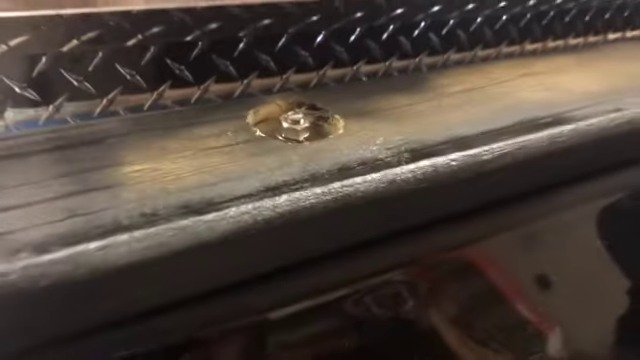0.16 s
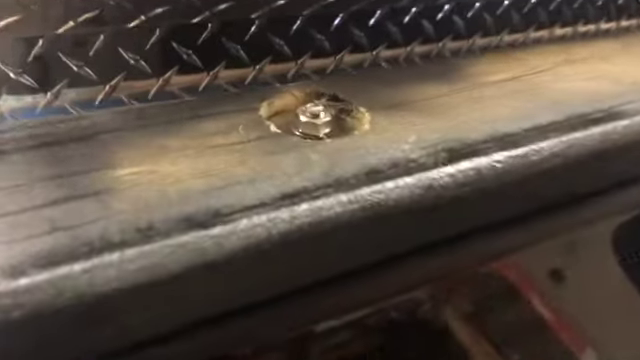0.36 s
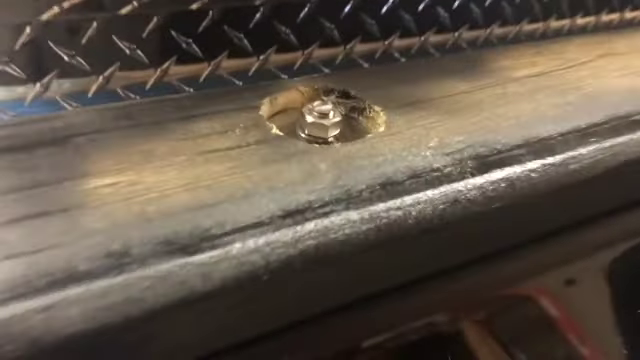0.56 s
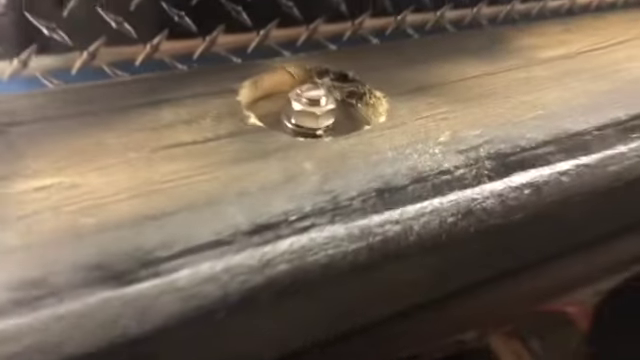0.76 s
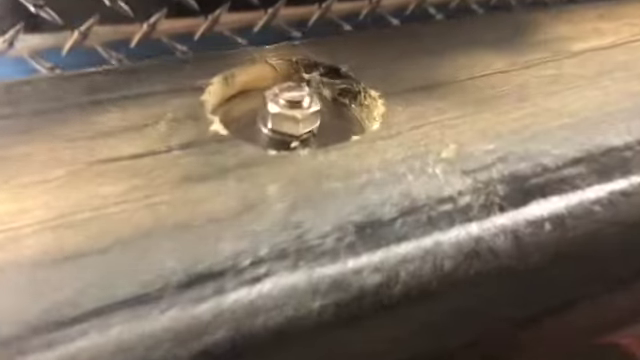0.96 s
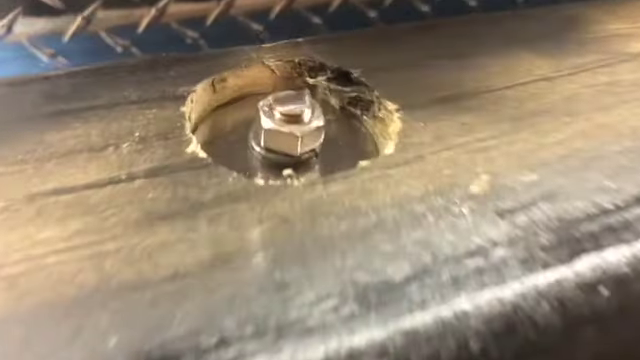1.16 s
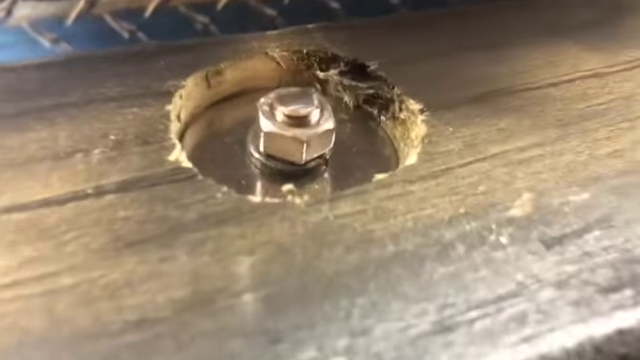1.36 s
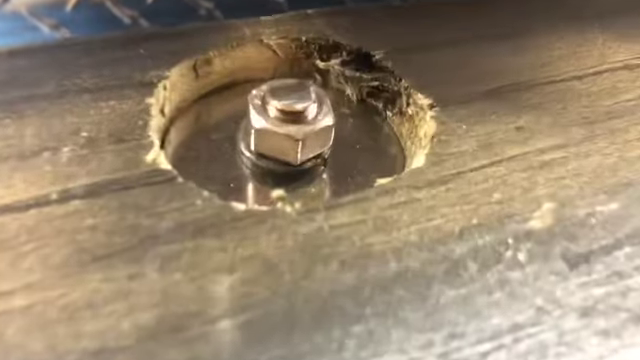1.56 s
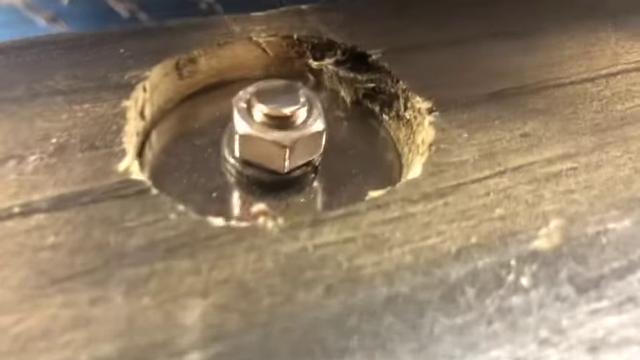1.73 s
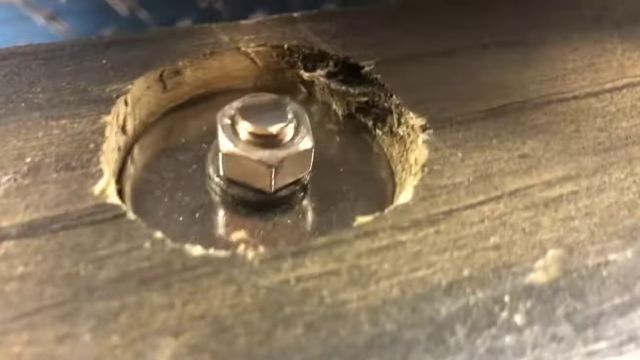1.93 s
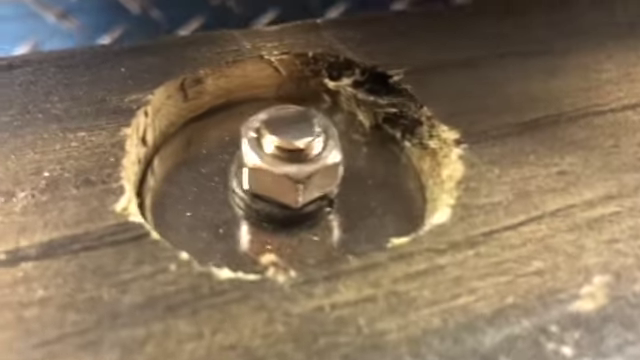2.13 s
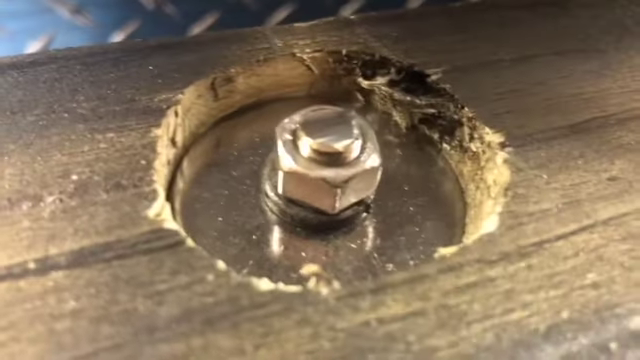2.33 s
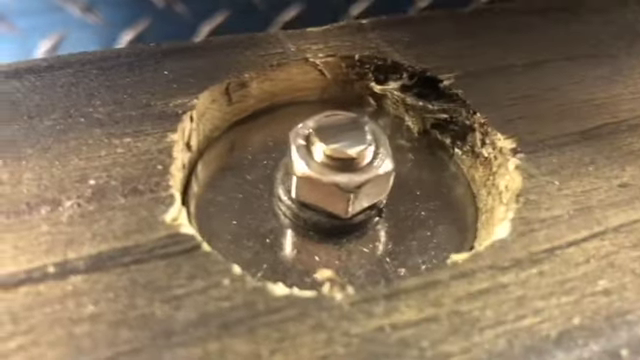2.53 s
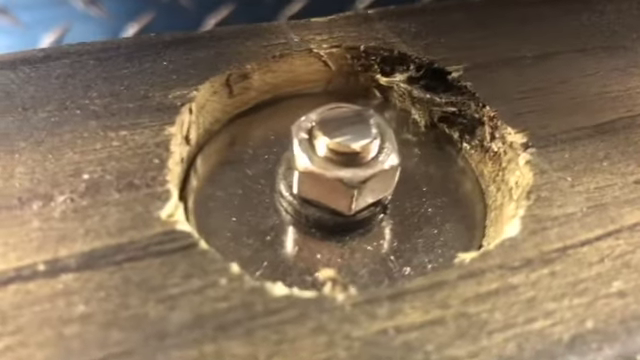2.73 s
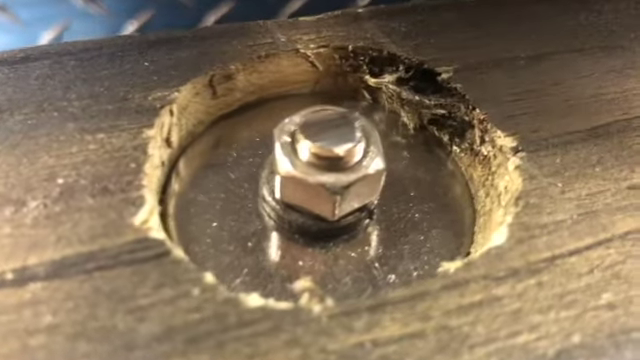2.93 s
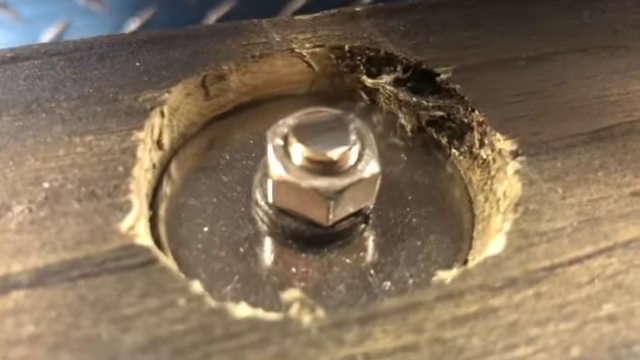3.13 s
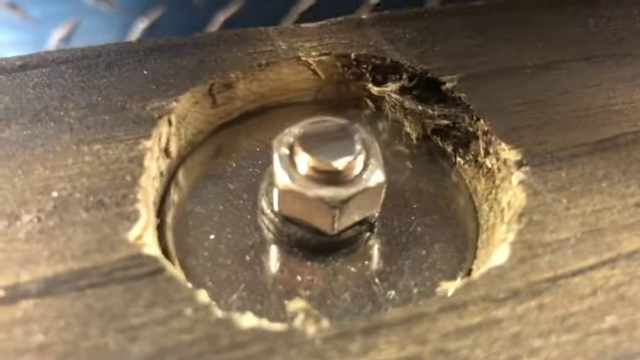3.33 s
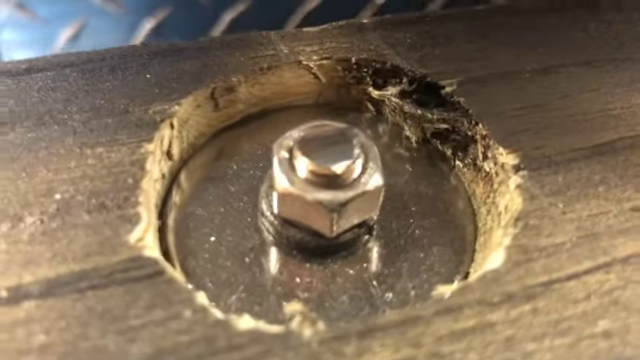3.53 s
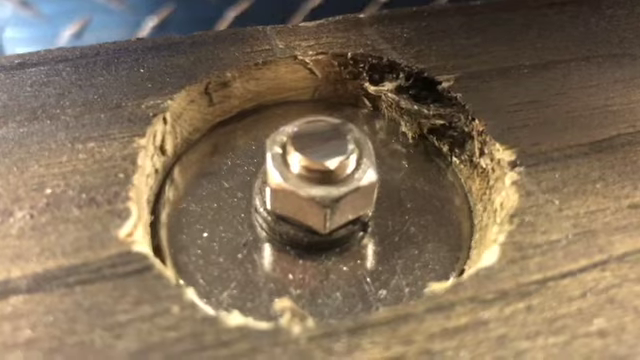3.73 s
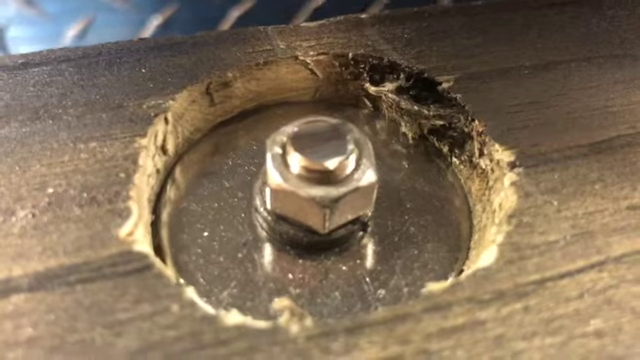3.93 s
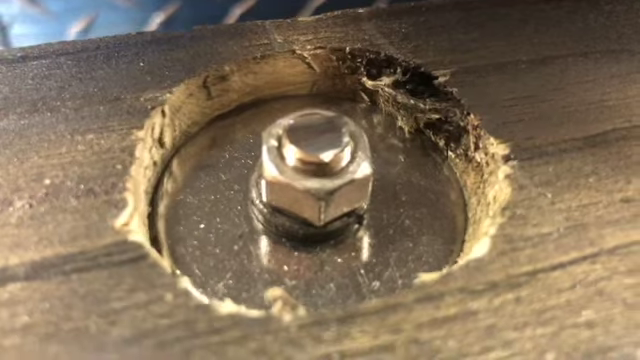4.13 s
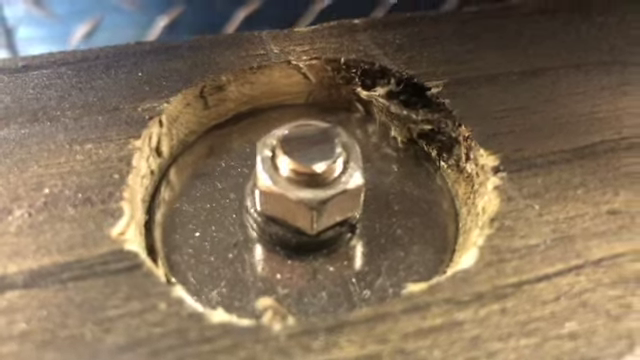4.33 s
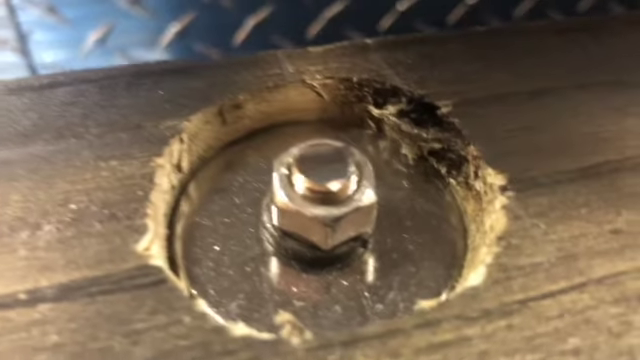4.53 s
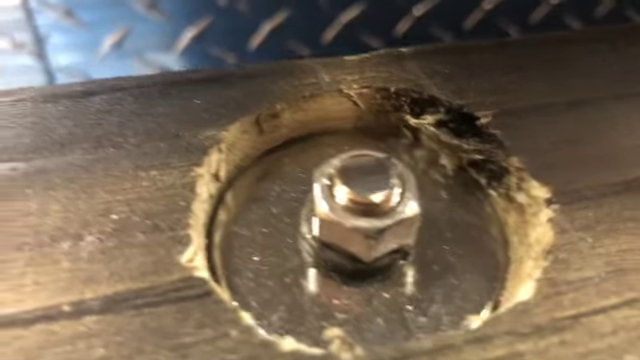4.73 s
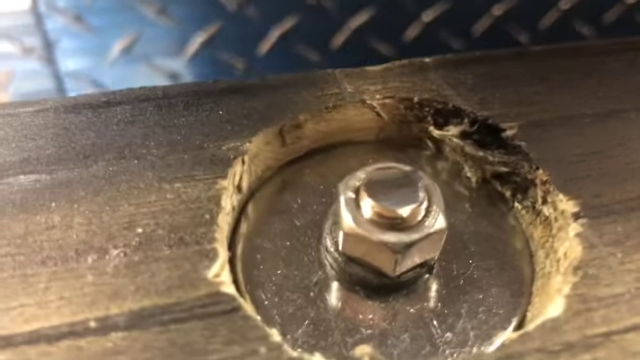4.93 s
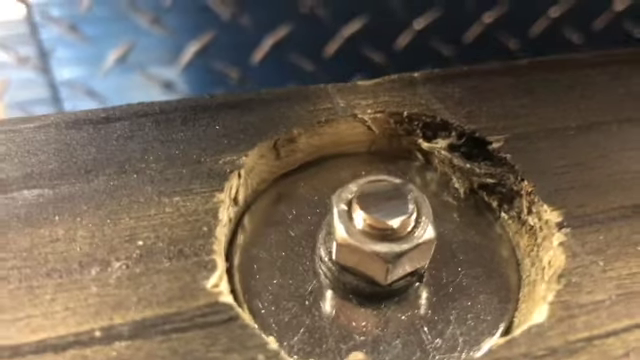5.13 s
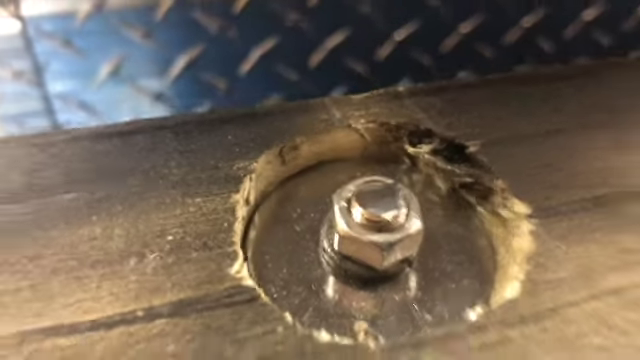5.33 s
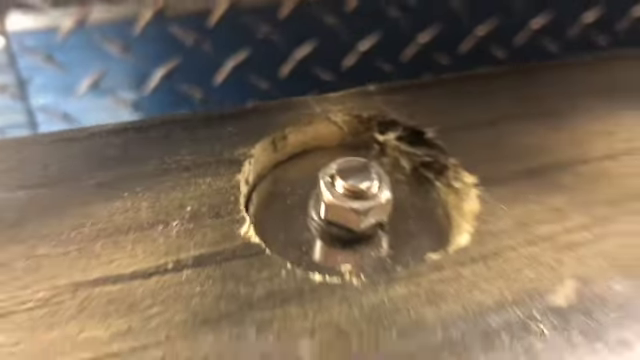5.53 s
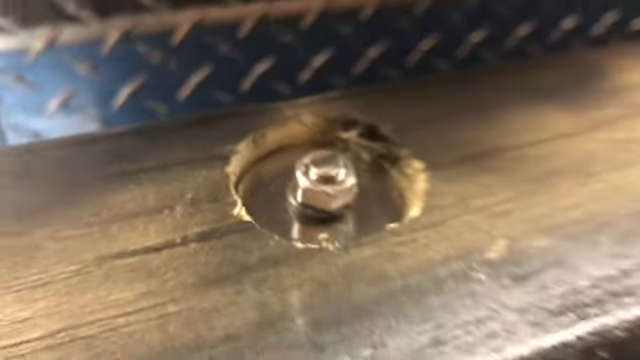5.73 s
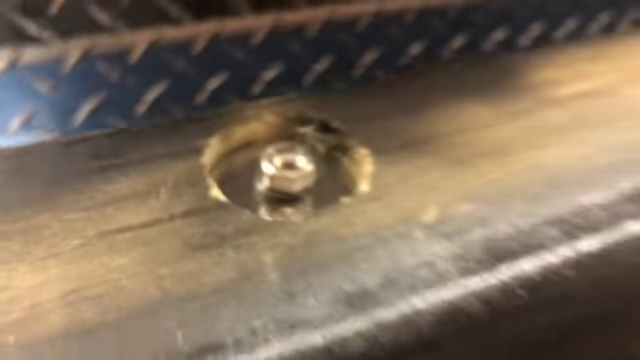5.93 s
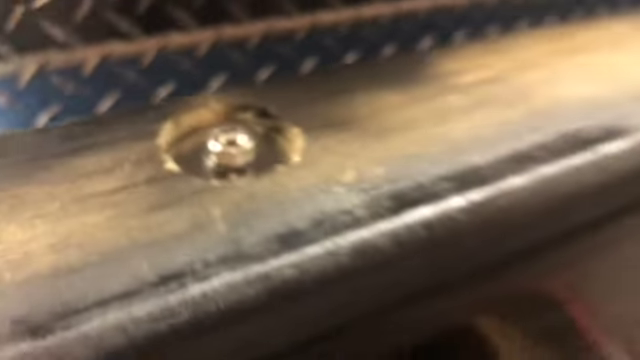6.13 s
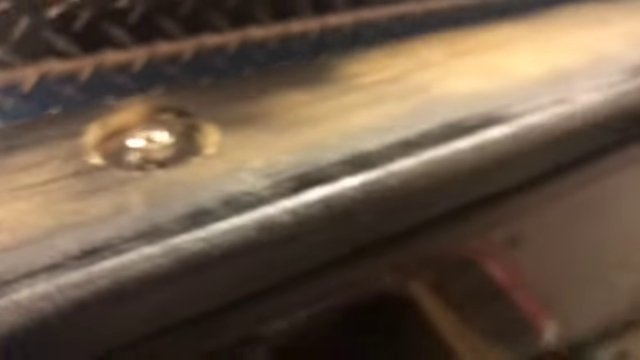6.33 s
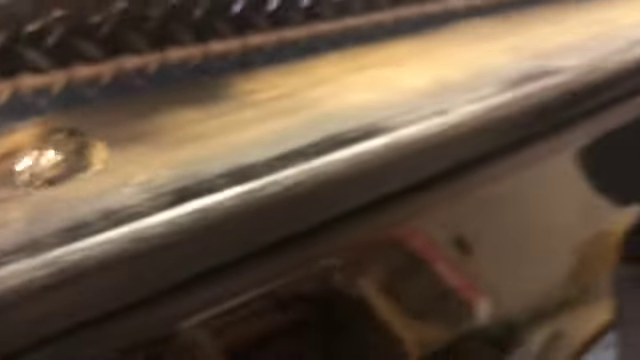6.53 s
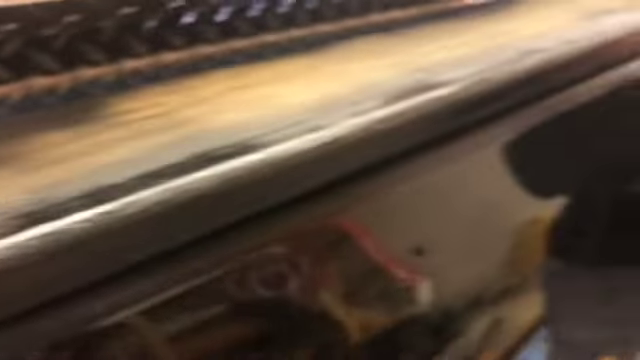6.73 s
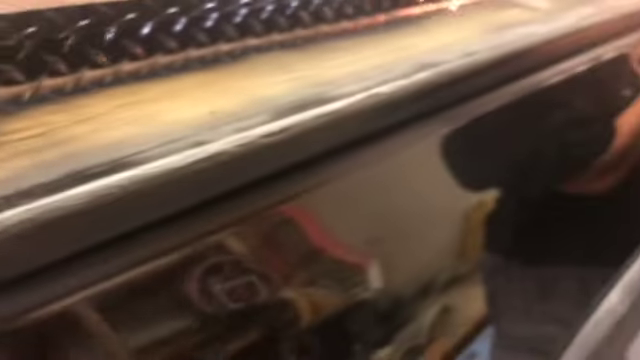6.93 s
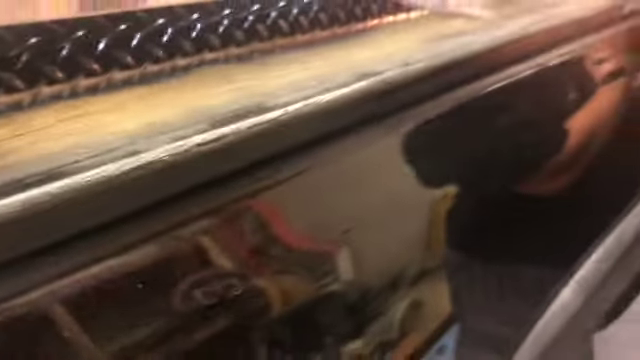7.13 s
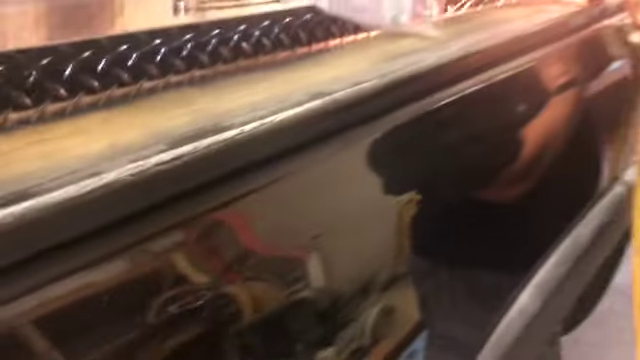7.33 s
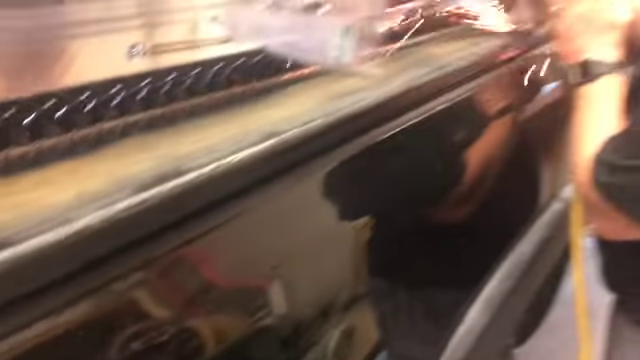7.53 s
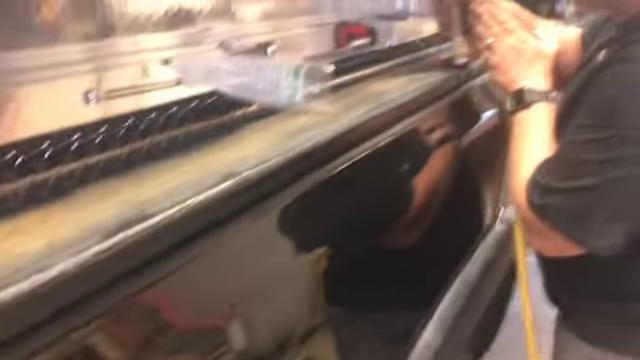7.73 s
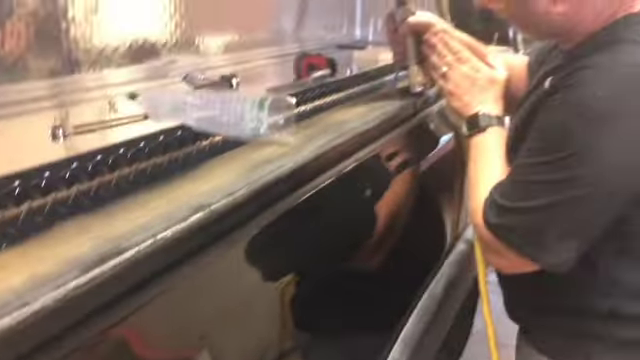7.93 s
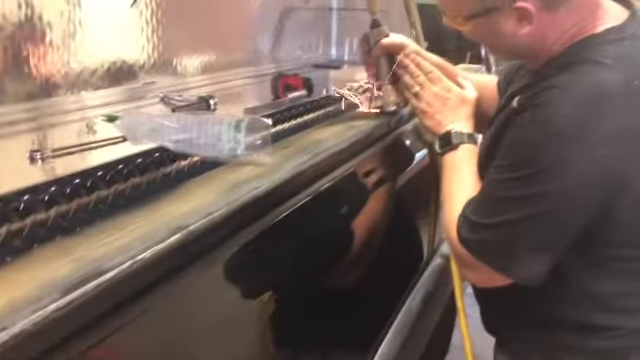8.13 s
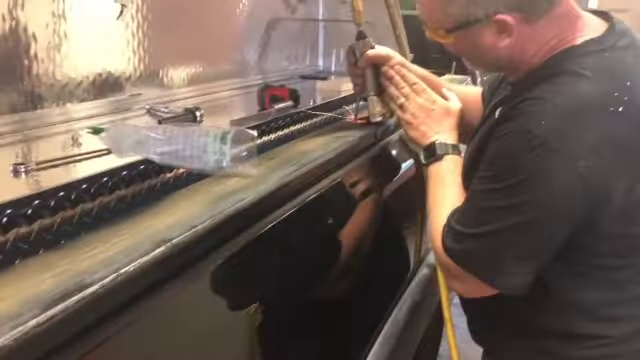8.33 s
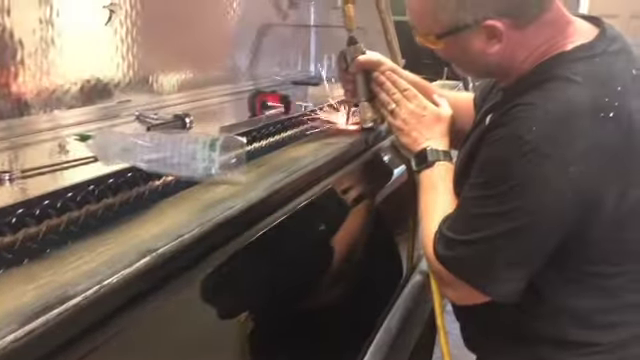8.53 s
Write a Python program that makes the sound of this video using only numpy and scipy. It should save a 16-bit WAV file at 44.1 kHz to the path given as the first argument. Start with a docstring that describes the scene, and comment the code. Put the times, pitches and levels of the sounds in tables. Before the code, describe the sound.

Quiet workshop with faint air hiss, knocks and metal clinks, then an air cut-off tool bursts into a high whine and grinds into a bolt.

```python
"""A quiet workshop with room tone, a faint air leak, rustling clothes, ticks, knocks and dull thuds, all shaped noise.
Then a valve lets in a rush of air and a four-vane air cut-off tool spins up with the lag of its rotor.
It runs free on vane tones, shaft orders (multiples of the turning rate) and exhaust hiss.
Last, its abrasive wheel bites into a bolt: the whine sags and climbs with the load, amid chatter and grit."""
import sys
import numpy as np
from scipy import signal
from scipy.fft import rfft, irfft
from scipy.io import wavfile
from scipy.ndimage import uniform_filter1d

SR = 44100
rng = np.random.default_rng(int(sys.argv[2]) if len(sys.argv) > 2 else 0)


def materialize(psi):
    """Save the field psi as 16-bit PCM at rate SR to the path in sys.argv[1].

    A 1-D psi becomes a single channel; in a 2-D psi each row is a channel.
    """
    bounded = np.clip(np.atleast_2d(psi).T, -1, 1)
    quanta = np.round(bounded * 32767).astype(np.int16)
    wavfile.write(sys.argv[1], SR, quanta)


N = 377937  # length in samples

VANES = 4
EDGE_HZ = 15750  # upper band limit
RUN_UP_DB_PER_MULTIPLE = -2  # slope of the row of vane multiples that barks while the rotor accelerates
# How the exhaust port and the shop colour the vane tone and its multiples.
# Each row: frequency in Hz, level in dB.
PORT = [(300, -35), (600, -25), (900, -23.5), (1150, -17.5), (1650, -18), (2000, -41), (2450, -18),
        (2900, -23), (3200, -28.5), (3500, -17), (3800, -35.5), (4000, -28), (4400, -41.5), (5050, -25.5),
        (6200, -33), (9000, -50)]


def gain_of(db):
    """Decibels to gain."""
    return 10 ** (np.asarray(db) / 20)


def evened(x):
    """Scales to rms 1."""
    return x / np.sqrt(np.mean(x ** 2) + 1e-20)


def read(points, hz):
    """Reads a spectrum table on a log-frequency axis."""
    f, value = np.transpose(points)
    return np.interp(np.log(hz + 1), np.log(f + 1), value)


def add(mix, s, sound):
    """Mixes a sound in at s seconds."""
    part = mix[round(s * SR):][:len(sound)]
    part += sound[:len(part)]


def bands(modes, hz):
    """Gain of a set of resonances, each given by centre Hz, width Hz and level dB, summed in power."""
    return np.sqrt(sum(gain_of(2 * db) / (1 + (2 * (hz - f) / width) ** 2) for f, width, db in modes))


def shaped(gain, size):
    """Steady noise of rms 1 whose spectrum is gain(hz)."""
    spectrum = rfft(rng.standard_normal(size))
    hz = np.fft.rfftfreq(size, 1 / SR)
    return evened(irfft(spectrum * gain(hz), size))


def coloured(points, size):
    """Steady noise of rms 1 with a tabled spectrum."""
    return shaped(lambda hz: gain_of(read(points, hz)), size)


def wander(size, rate):
    """Slow chance of rms 1, changing about rate times a second."""
    steps_per_s = 400
    steps = rng.standard_normal(int(size / SR * steps_per_s) + 2)
    width = max(int(steps_per_s / rate), 1)
    slow = evened(uniform_filter1d(uniform_filter1d(steps, width), width))
    return np.interp(np.arange(size) / SR * steps_per_s, np.arange(len(slow)), slow)


def patchy(x, depth_db, count=24):
    """Lets bands a few hundred hertz wide swell and fade on their own, each for about count frames."""
    z = signal.stft(x, nperseg=512)[2]
    patches = uniform_filter1d(rng.standard_normal(z.shape), size=4, axis=0)
    patches = uniform_filter1d(patches, size=count, axis=1)
    flickering = z * gain_of(depth_db * evened(patches))
    return evened(signal.istft(flickering, nperseg=512)[1][:len(x)])


def dying(noise, db, rise, t60):
    """Lets noise rise for rise seconds, then die away by 60 dB in t60 seconds."""
    t = np.arange(len(noise)) / SR
    decay = gain_of(db - 60 * np.maximum(t - rise, 0) / t60)
    return decay * np.minimum(t / rise, 1) * noise


def shop():
    """Room tone, the hiss of a leaking air line in whistling bands, and the rustle of clothes."""
    # Spectrum of the room tone. Each row: frequency in Hz, relative level in dB per Hz.
    room_colour = [(15, -58), (25, -18), (107, 5), (391, -10), (767, -26), (854, -12.5), (1350, -36),
                   (1590, -31.5), (15700, -20.5)]
    # Whistling bands of the leak. Each row: centre in Hz, width in Hz, relative level in dB.
    leak_bands = [(5570, 380, 6.5), (7900, 500, 6), (10300, 260, 1), (12350, 250, -15), (13800, 540, 3),
                  (10800, 8500, 6)]
    # Slow course of leak and clothes. Each row: time in seconds, leak hiss in dB, rustle in dB.
    air = [(0, -76, -66.5), (.37, -64, -66), (.6, -70, -63.5), (1.0, -68, -62), (1.4, -76, -61.5),
           (1.7, -86, -62.5), (2.1, -66, -69.5), (2.6, -65.5, -70.5), (4.2, -64.5, -73), (5.1, -65, -72.5)]
    rustle_colour = [(200, -6.0), (1200, -3.0), (4000, -9), (12000, -14.5)]  # Hz, relative dB per Hz
    room_db = -66
    s, leak_db, rustle_db = np.transpose(air)
    t = np.arange(N) / SR
    leak = patchy(shaped(lambda hz: bands(leak_bands, hz), N), depth_db=3.5, count=90)
    leak = leak * gain_of(np.interp(t, s, leak_db))
    rustle = coloured(rustle_colour, N) * gain_of(np.interp(t, s, rustle_db))
    rustle = rustle * gain_of(1.5 * wander(N, 25))
    return gain_of(room_db) * coloured(room_colour, N) + leak + rustle


def thud(db, ring, bright_db, boom_db):
    """A far burst of noise whose bands die away at the hall's own speeds, over the boom of the floor."""
    # Spectrum of the burst. Each row: frequency in Hz, relative level in dB per Hz.
    burst_colour = [(47, -47), (80, -23), (255, 11.5), (574, -17), (715, -7), (1680, -22.5), (2330, -40),
                    (15000, -66.5)]
    # Decay of the hall, before the ring factor. Each row: frequency in Hz, t60 in seconds.
    hall = [(100, 0.21), (260, 0.52), (700, 0.33), (1840, 0.15), (4850, 0.12)]
    boom_hz, boom_width_hz, boom_t60 = 128, 65, 0.74
    hz, t, z = signal.stft(rng.standard_normal(SR), SR, nperseg=256)
    shape_db = read(burst_colour, hz) + bright_db * np.log2((np.minimum(hz, 5000) + 40) / 500)
    t60 = ring * read(hall, hz)[:, None]
    z = z * gain_of(shape_db[:, None] - 60 * t / t60)
    burst = signal.istft(z, SR, nperseg=256)[1][:SR]
    attack = np.minimum(np.arange(SR) / (.0025 * SR), 1)
    burst = burst * attack / np.sqrt(np.mean(burst[:1000] ** 2))  # level set by the first moment
    boom = shaped(lambda f: bands([(boom_hz, boom_width_hz, 0)], f) ** 2, SR)
    return gain_of(db) * burst + dying(boom, boom_db, 0.024, boom_t60)


def knock(db, bright_db, t60):
    """A short dense clunk with the colour of the plank and a hard front."""
    # Spectrum of the plank. Each row: frequency in Hz, relative level in dB per Hz.
    wood = [(35, -48), (60, 8.5), (324, 14.5), (835, 3), (1010, 1.5), (1710, -22), (2420, -25.5),
            (3500, -36.5), (15000, -56)]
    crack, crack_s = 1.2, .006  # the first moment stands out: extra gain, fade in seconds
    size = SR // 4
    plank = shaped(lambda hz: gain_of(read(wood, hz) + bright_db * np.log2((hz + 40) / 500)), size)
    front = 1 + crack * np.exp(-np.arange(size) / (crack_s * SR))
    return dying(plank, db, .0015, t60) * front


def tick(db, hz, width_hz, rise, t60):
    """A dying puff of noise around one pitch."""
    return dying(shaped(lambda f: bands([(hz, width_hz, 0)], f) ** 2, SR // 3), db, rise, t60)


def clink(db, t60):
    """A metal fitting rattles: a broad tick, then noise through the resonances of the fitting."""
    # Resonances of the metal. Each row: centre in Hz, width in Hz, relative level in dB.
    fitting = [(880, 69, 2.5), (2050, 110, -1.5), (4600, 430, -3.5), (5340, 380, -2), (6350, 350, 2),
               (8000, 210, 2.5), (10300, 320, -7), (13200, 600, -11)]
    ring = dying(shaped(lambda hz: bands(fitting, hz), SR // 3), db, 0.0028, t60)
    return ring + tick(db - 2.0, 8200, 12000, 0.0009, 0.033)


def valve():
    """The throttle opens with a rough rush of air."""
    # Spectrum of the first rush. Each row: frequency in Hz, relative level in dB per Hz.
    rush = [(60, -27), (150, -3), (300, 2.5), (900, -3.5), (1250, -4), (1600, 0.5), (2000, -11.5),
            (8000, -18)]
    return dying(coloured(rush, SR // 2), db=-15, rise=0.02, t60=0.2)


def rotor(t):
    """Shaft speed in turns a second: the rotor chases the allowed speed with a lag."""
    # The speed that air supply and load allow. Each row: time in seconds, shaft turns a second.
    aim = [(5.17, 120.8), (5.228, 295.3), (5.411, 317.4), (6.472, 317.4), (6.511, 311.2), (6.616, 313.9),
           (6.826, 339.8), (7.128, 333.0), (7.356, 310.3), (7.455, 317.5), (7.637, 379.7), (7.709, 375.5),
           (7.777, 383.1), (7.984, 383.0), (8.157, 365.3), (8.174, 371.1), (8.433, 379.7), (8.44, 334.4)]
    lag_s, kick = .063, 45  # time constant; first speed in turns a second
    keep = np.exp(-1 / (lag_s * SR))
    allowed = np.interp(t, *np.transpose(aim))
    return kick + signal.lfilter([1 - keep], [1, -keep], allowed - kick)


def exhaust(turns, bite):
    """Hiss of the vented air, puffed by each vane; it gives way to the grinding."""
    # Spectrum of the air hiss. Each row: frequency in Hz, relative level in dB per Hz.
    air_colour = [(60, -27), (200, -19.5), (450, -22.5), (1100, -9), (1550, -3), (2100, -15.5), (2600, 0),
                  (4000, -6.5), (6700, -1), (10000, -5.5), (12500, -7), (15700, -6)]
    puffs = 1 + 0.079 * np.cos(2 * np.pi * VANES * turns)
    return patchy(coloured(air_colour, len(turns)), depth_db=2.5) * puffs * np.sqrt(1 - bite)


def grinding(turns, bite):
    """Grit on steel: noise that swells as the wheel's high spot meets the bolt once a turn."""
    # Spectrum of the grit with the ring of the wheel. Each row: frequency in Hz, relative level in dB per Hz.
    grit_colour = [(60, -24), (400, -24), (1200, -22), (2200, -7.5), (3500, -18), (5000, 5.5), (7000, -3),
                   (8500, 5.5), (9100, 7.5), (9800, 1), (12000, -0.5), (15700, -1)]
    scrape = 1 + 0.11 * np.cos(2 * np.pi * turns)
    grit = patchy(coloured(grit_colour, len(turns)), depth_db=2.2)
    return grit * scrape * np.sqrt(bite) * gain_of(1.8 * wander(len(turns), 30))


def vane_levels(t, speed, run_up, bite, vane_db, second_db):
    """Levels in dB of the first four vane multiples, coloured by the port they sweep through."""
    # Brief changes, mostly dips, of the 2nd multiple. Each row: time in seconds, change in dB, length in seconds.
    dropouts = [(5.595, -9.5, 0.059), (6.788, -16, 0.057), (7.181, -15, 0.046), (7.24, -16, 0.022),
                (7.399, 1, 0.044), (7.665, -8, 0.023), (8.162, -16, 0.022), (8.28, -18, 0.03),
                (8.452, -13, 0.026)]
    second_db = second_db + sum(db * np.exp(-(2 * (t - at) / length) ** 2) for at, db, length in dropouts)
    fourth_db = -11.5 * bite  # the 4th multiple weakens under load
    levels = {}
    for m, db in enumerate((vane_db, second_db, 0, fourth_db)):
        order = VANES * (m + 1)
        levels[order] = read(PORT, order * speed) + db + RUN_UP_DB_PER_MULTIPLE * m * run_up
    return levels


def weak_levels(orders, speed, run_up, bite, change_db, chatter_db):
    """Levels in dB of the other shaft orders: motor and wheel chatter, with a bark on the vane multiples."""
    # Shaft orders that stand out, as multiples of the turning rate.
    strong_orders = (2, 3, 5, 6, 9, 10, 13, 15, 17, 20, 22, 25, 27, 31, 33, 36, 44)
    # Level in dB of each of those orders, before the level change is added.
    strong_db = [-51.5, -48, -39, -51.5, -46, -36.5, -43.5, -44, -44, -32.5, -37, -40, -41.5, -40, -40.5,
                 -38.5, -48]
    # How wheel and bolt radiate. Each row: frequency in Hz, level in dB.
    radiation = [(300, -26), (1900, -14.5), (3500, -17.5), (4700, -8.5), (5500, -9), (7000, -5.5),
                 (9000, -13), (12000, -9.5), (15500, -16)]
    # Rings of the wheel that flare the orders crossing them. Each row: centre in Hz, width in Hz, level in dB.
    wheel = [(4600, 220, 5.5), (5390, 250, 8), (6240, 138, 9.5), (8960, 230, 10.5), (11640, 580, 2),
             (8000, 27000, -2)]
    faint_db = -51.5  # every other order, before the level change is added
    strong = dict(zip(strong_orders, strong_db))
    size = len(speed)
    levels = {}
    for k in orders:
        hz = k * speed
        # weak orders swell and fade as the hand turns the tool; the wheel's chatter breaks up faster
        swell_db = (1.0 + 1.09 * bite) * wander(size, 4.6)
        motor = gain_of(strong.get(k, faint_db) + change_db + swell_db)
        breakup_db = 3.1 * wander(size, 21.5) + 3.86 * wander(size, 10)
        chatter = gain_of(chatter_db + read(radiation, hz) + breakup_db) * bands(wheel, hz)
        bark = gain_of(read(PORT, hz) + RUN_UP_DB_PER_MULTIPLE * (k / VANES + 5))
        bark = run_up * (k % VANES == 0) * bark
        levels[k] = 20 * np.log10(np.hypot(motor, chatter) + bark)
    return levels


def order_tones(levels, speed, turns, bite):
    """Sums one sine per shaft order, all locked to the turning of the rotor."""
    glide = np.minimum(abs(np.gradient(speed)) * SR / 500, 1)
    tones = np.zeros(len(speed))
    for k, db in levels.items():
        # tones stutter under the grit, and, the higher the more up to the 2nd vane multiple,
        # while gliding across the resonances of the shop
        stutter_db = 0.59 + 0.53 * bite + 3.25 * glide * min(k / (2 * VANES), 1) ** 2
        level = gain_of(db + stutter_db * wander(len(speed), 70))
        start = rng.random() * (k % VANES > 0)  # vane multiples add up to one pulse
        below_edge = k * speed < EDGE_HZ
        tones += np.sqrt(2) * level * below_edge * np.cos(2 * np.pi * (k * turns + start))
    return tones


def tool():
    """Vane tones and shaft orders on one speed, with exhaust hiss, grinding noise and wall echoes."""
    # Course of the tool's sound. Each row: time in seconds, vane tone in dB above the port colour,
    # its 2nd multiple likewise in dB, 14th shaft order in dB, hiss in dB.
    course = [(5.169, 10, 0, -47, -32), (5.2, 4, -2.5, -42, -22.5), (5.42, -1, 1.5, -55, -25.5),
              (5.6, -10.5, 1, -42, -23.5), (5.8, -17.5, 5.5, -49, -25.5), (6.0, -23.5, 2, -50, -25),
              (6.1, -18, 3.5, -40, -24.5), (6.25, -12, 3.5, -43, -25.5), (6.55, -11.5, 1, -54, -24.5),
              (6.78, -0.5, -10.5, -40, -19.5), (6.88, -2.5, 2, -33, -25.5), (7.04, -4, 0, -31, -28.5),
              (7.2, 0, -2.5, -27.5, -24.5), (7.429, -6.5, -10, -24, -23.5), (7.56, -0.5, 0.5, -34, -27),
              (7.67, -6, -4.5, -27.5, -23), (7.8, -4.5, 5.5, -52, -26.5), (8.05, -6.5, 8, -54, -24),
              (8.18, -3.5, -7, -48, -25.5), (8.4, -4, 2, -55, -25), (8.56, -1, -1.5, -44, -26)]
    # Course of the work. Each row: time in seconds, share of grinding in the hiss from 0 to 1,
    # level change of the weak orders in dB, chatter of the wheel in dB.
    work = [(5.17, 0, -4, -63), (5.55, 0, -1.5, -65), (6.45, 0.32, -1.5, -60), (6.6, 0.58, 1.5, -36.5),
            (6.8, 0.75, -13, -33), (7.0, 0.47, -19, -34), (7.4, 0.63, -3, -30.5), (7.6, 0.47, -21, -34.5),
            (7.75, 0.42, -22, -33.5), (8.0, 0.54, -14.5, -38), (8.4, 0.44, -13, -36), (8.5, 0.38, -20, -34)]
    # Unbalance hum, once a turn. Each row: frequency in Hz, level in dB.
    hum = [(200, -64), (305, -64), (314, -45), (324, -42), (336, -68), (360, -57), (372, -48.5), (383, -67)]
    # Walls near the tool. Each row: delay in seconds, level in dB.
    echoes = [(.011, -24.5), (.023, -17)]
    top_order, build_s = 49, 0.051  # the tones grow out of the first rush of air for build_s seconds
    s, *columns = np.transpose(course)
    t = np.arange(s[0], N / SR, 1 / SR)
    vane_db, second_db, whistle_db, hiss_db = (np.interp(t, s, c) for c in columns)
    work_s, *work_columns = np.transpose(work)
    bite, change_db, chatter_db = (np.interp(t, work_s, c) for c in work_columns)
    bite = np.clip(bite, 0, 1)

    speed = rotor(t)
    run_up = np.clip(np.gradient(speed) * SR / 1500, 0, 1)
    unsteady = 1 + (0.00013 + 0.0011 * bite) * wander(len(t), 40)
    turns = np.cumsum(speed * unsteady) / SR

    levels = vane_levels(t, speed, run_up, bite, vane_db, second_db)
    levels.update({1: read(hum, speed), 14: whistle_db})
    others = sorted(set(range(1, top_order + 1)) - set(levels))
    levels.update(weak_levels(others, speed, run_up, bite, change_db, chatter_db))
    tones = order_tones(levels, speed, turns, bite)
    tones = tones * np.minimum((t - s[0]) / build_s, 1) ** 2
    hiss = gain_of(hiss_db) * (exhaust(turns, bite) + grinding(turns, bite))
    direct = (tones + hiss) * np.minimum((t - s[0]) / 0.0053, 1)
    heard = direct.copy()
    for delay, db in echoes:
        add(heard, delay, gain_of(db) * direct)
    return s[0], heard


def scene():
    """Everything reaches one microphone, the same on both channels."""
    # Far thuds. Each row: start in seconds, level in dB, ring time as a factor,
    # brightness in dB an octave, floor boom in dB.
    thuds = [(1.084, -30, 2.17, 11.5, -41.5), (1.788, -37, 1.34, 6, -58.5), (1.949, -45.5, 1.46, 4.5, -62),
             (2.093, -45.5, 0.79, 0.5, -64), (2.162, -44, 1.47, 3.7, -63), (2.332, -47.5, 1.4, -3.5, -60),
             (2.565, -41.5, 0.78, 1.1, -41), (2.78, -59, 1.9, 2, -51), (3.631, -54.5, 1.45, 6, -51),
             (3.97, -55.5, 1.15, -6, -49), (4.134, -56, 1.7, -6, -61)]
    # Near knocks on wood. Each row: start in seconds, level in dB before the hard front,
    # brightness in dB an octave, t60 in seconds.
    knocks = [(0.227, -57, 10.5, 0.2), (0.517, -45.5, 5.5, 0.1), (1.0305, -18.5, 4.5, 0.12),
              (3.584, -58.5, 3, 0.48), (3.68, -66, -4, 0.083)]
    # Ticks, scuffs, a squeak, a swell of hiss and the ring of a metallic clang.
    # Each row: start in seconds, level in dB, centre in Hz, width in Hz, rise in seconds, t60 in seconds.
    ticks = [(.32, -58, 8500, 6900, .06, 0.37), (1.09, -54.5, 3850, 140, .02, .7),
             (1.09, -59, 5000, 200, .02, .6), (1.086, -39, 2500, 6000, .001, .04),
             (1.479, -55, 3200, 1500, .003, .03), (.595, -58, 2700, 5000, .003, .04),
             (.24, -58, 3400, 400, .004, 0.065), (.483, -55, 3100, 2800, 0.0014, .03),
             (.502, -45, 1640, 150, 0.0026, 0.034), (.5225, -49, 3700, 1500, 0.0013, 0.025),
             (1.03, -44, 3000, 5000, 0.0028, 0.013), (1.462, -52, 1250, 600, 0.0063, 0.037),
             (1.6, -54, 3600, 2200, 0.0023, 0.044), (1.086, -47, 3200, 7700, .0015, 0.88),
             (1.555, -55.5, 1260, 300, 0.017, 0.067), (1.562, -54, 7700, 1447, 0.013, 0.077),
             (1.617, -51.5, 3000, 8000, .0015, 0.036), (1.681, -44, 1200, 510, 0.0024, 0.057),
             (1.681, -42, 5700, 12000, .0015, 0.015), (2.25, -58.5, 3400, 1100, .008, 0.18),
             (2.3, -60, 3000, 1600, 0.008, 0.18), (2.315, -58, 5600, 2500, 0.0034, 0.06),
             (2.443, -55, 2600, 4000, 0.00099, 0.11), (3.93, -55.5, 4030, 80, 0.038, 0.07),
             (3.915, -60, 1200, 2800, 0.025, .3)]
    # Rattles of a metal fitting. Each row: start in seconds, level in dB, t60 in seconds.
    clinks = [(3.5869, -40.5, 0.17), (3.629, -53.5, 0.28), (3.68, -45.5, 0.18), (3.992, -51.5, 0.061)]
    mix = shop()
    for events, source in ((thuds, thud), (knocks, knock), (ticks, tick), (clinks, clink)):
        for s, *row in events:
            add(mix, s, source(*row))
    add(mix, 5.176, valve())
    add(mix, *tool())
    return np.array([mix, mix])


def record(dry):
    """The input rounds off the highest peaks and drops the deepest bass; then the band limit."""
    soft = dry / (1 + (dry / .55) ** 4) ** (1 / 4)
    soft = signal.sosfilt(signal.butter(3, 50, "high", fs=SR, output="sos"), soft)
    band_limit = signal.firwin(1023, EDGE_HZ, window=("kaiser", 11), fs=SR)
    return signal.oaconvolve(soft, band_limit[None], "same")


dry = scene()
out = record(dry)
materialize(out)
```